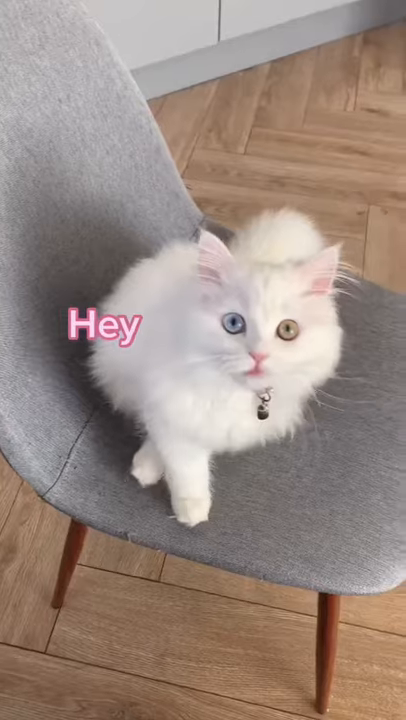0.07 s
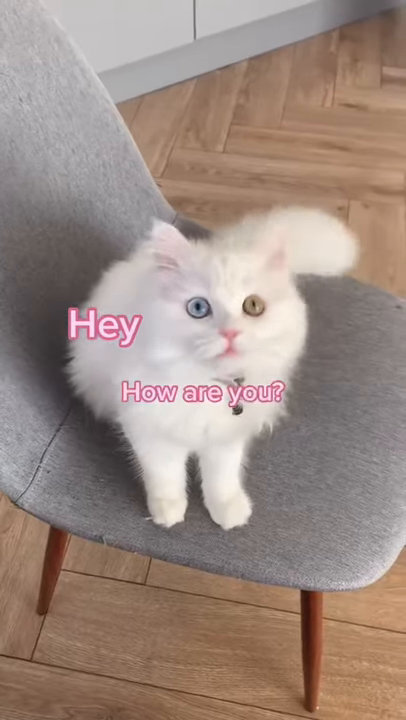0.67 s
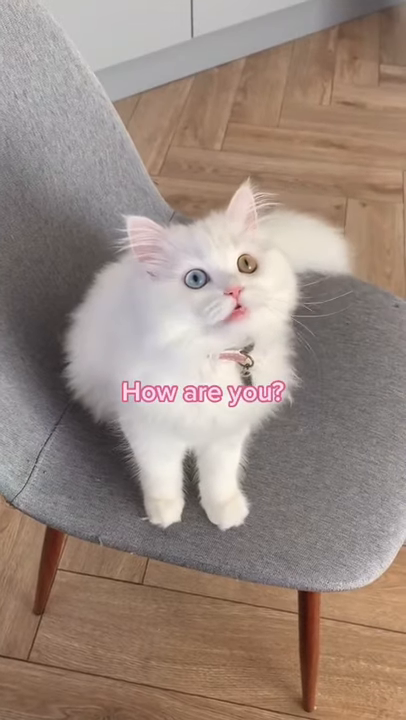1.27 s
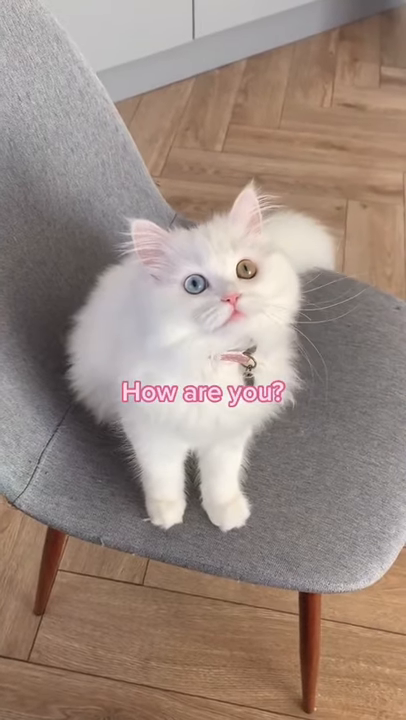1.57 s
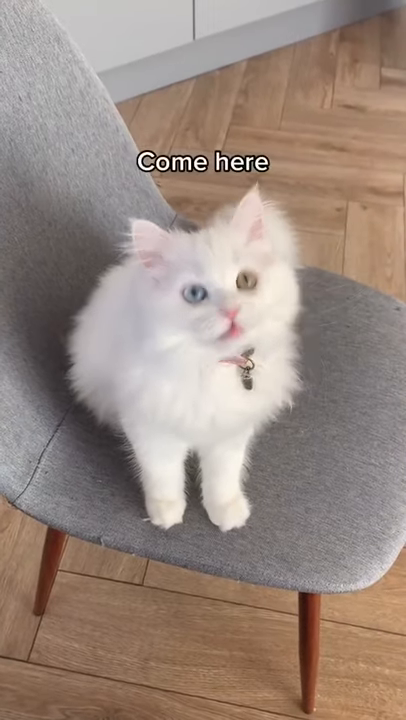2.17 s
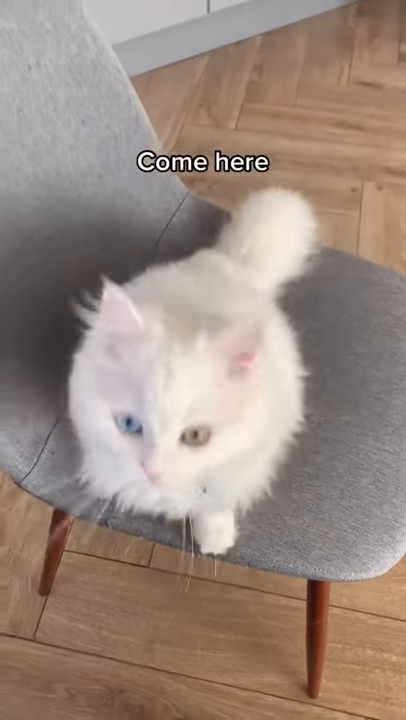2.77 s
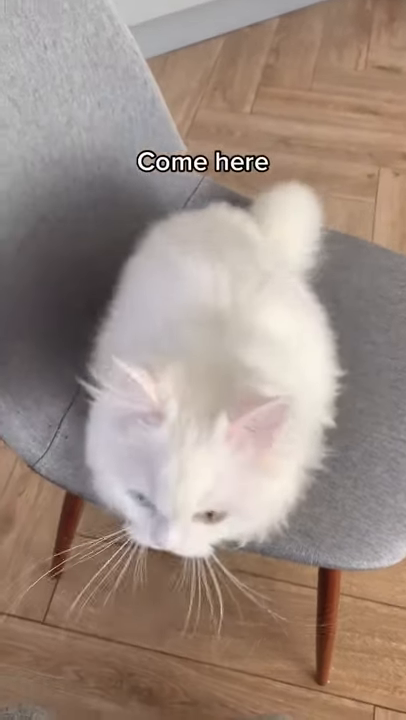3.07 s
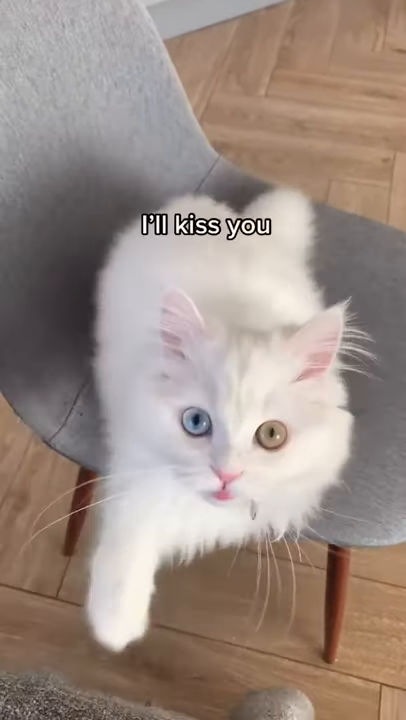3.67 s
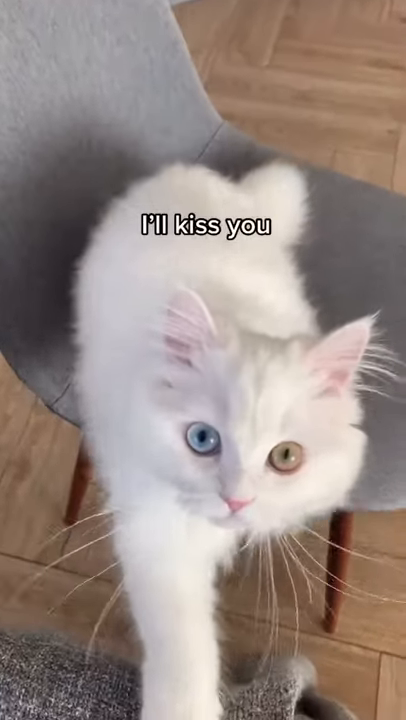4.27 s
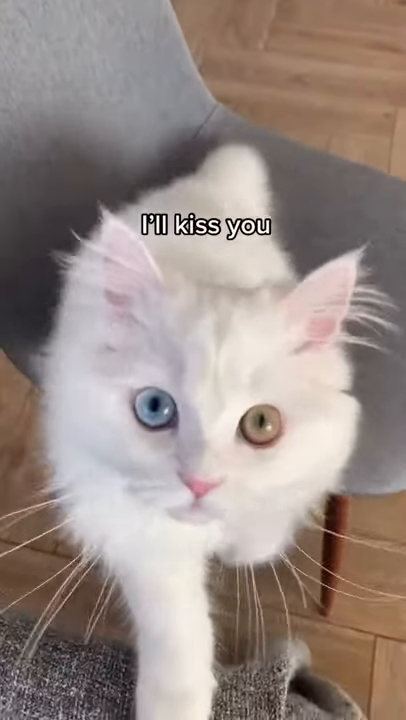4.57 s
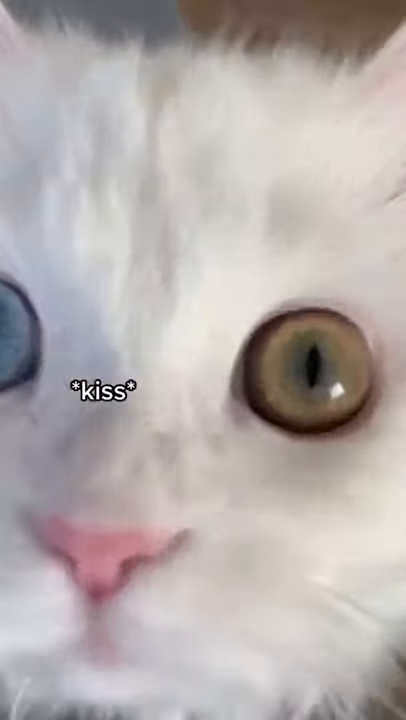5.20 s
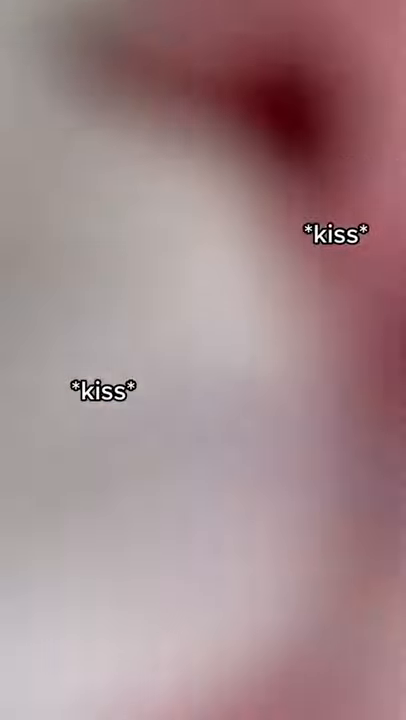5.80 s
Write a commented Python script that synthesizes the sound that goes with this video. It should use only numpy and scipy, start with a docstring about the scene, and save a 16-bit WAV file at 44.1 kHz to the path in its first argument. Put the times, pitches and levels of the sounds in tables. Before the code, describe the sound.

A young cat is close to a phone microphone in a quiet room, over steady low rumble and an appliance hum. It opens with a short sniff, then faint wet mouth clicks and tiny shivers of a metal collar tag. From 0.9 to 1.4 seconds it gives a soft, high meow that flips between two pitches, turning rough at each flip. A breathy squeak comes at 2.1 seconds and a very short grunt with a sharper mouth click at 2.5, both with sniffs. A faint lick at 3.3 leads to a chirp at 3.5 and a thin, quiet whine at 3.8. A fuller, warbling trill runs from 4.4 to 4.7, followed by a tiny falling peep at 5.2. At about 5.5 seconds fur brushes the microphone and the nose bumps it with a low, muffled thump, and the sound cuts off.

```python
"""A young cat on a chair, close to a phone in a quiet room, over low rumble and an appliance hum.
It sniffs, its wet mouth clicks and its collar tag shivers. From 0.9 s its vocal folds give a soft meow
that flips between two registers, rough at each flip. A squeak (2.1 s), a grunt (2.5 s), a lick (3.3 s)
and a chirp (3.5 s) follow among sniffs and clicks, then a whine (3.8 s), a trill (4.4 s) and a peep (5.2 s).
At 5.5 s its nose bumps the microphone and the sound stops."""
import sys
import numpy as np
from scipy import signal
from scipy.fft import rfft, irfft, next_fast_len
from scipy.io import wavfile
from scipy.ndimage import map_coordinates

SR = 44100
rng = np.random.default_rng(int(sys.argv[2]) if len(sys.argv) > 2 else 0)


def transcribe(u):
    """Save the signal u as a 16-bit wav file named by the first command-line argument.

    u: samples, shape (n,) or (channels, n), limited to [-1, 1]; the rate is SR.
    q: integer samples, one column per channel.
    """
    v = np.clip(np.atleast_2d(u).T, -1, 1)
    q = np.round(v * 32767).astype(np.int16)
    wavfile.write(sys.argv[1], SR, q)


N = 261954
TIME = np.arange(N) / SR


def cat_voice():
    """Seven calls, voiced through spread or rounded lips."""
    # note chains; registers near 850 Hz (mouth nearly shut) and 700 Hz (open): (time [s], first pitch [Hz],
    # last pitch [Hz], fundamental [dB], 2nd harmonic [dB], upper harmonics [dB], swell [dB], closing [dB])
    meow_notes = [(.9, 910, 900, -49, -62, -51.5, 8, 4.5), (.912, 762, 770.5, -59.5, -50, -47.5, 8.5, 14.5),
                  (1.006, 864, 860, -60, -67, -73.5, 3.5, 9), (1.118, 870, 877, -58, -65, -60.5, 0.5, -0.5),
                  (1.191, 673.7, 632.3, -53, -47, -62, -5.5, 22.5),
                  (1.362, 621, 569, -58, -52.5, -82, -1.5, 3), (1.409, 670, 683, -52, -59, -96, -8, 3)]
    whine_notes = [(3.768, 888, 843, -64.5, -62.5, -76.5, -10.5, -1),
                   (3.845, 790, 827, -66, -66, -83, -4, -9)]
    trill_notes = [(4.39, 828, 860, -57, -60, -94.5, 2, -10), (4.429, 671, 649, -53, -47.5, -75, 2, 4),
                   (4.463, 824.4, 869, -57.5, -58.5, -67.5, -5, 13),
                   (4.557, 692.6, 704, -45.5, -38, -56.5, 6.5, -9),
                   (4.602, 662, 669, -49, -35, -43, 0.5, 12), (4.640, 816, 885, -46.5, -47, -47.5, 5.5, 13)]
    # single glides:
    # (time [s], pitch [Hz], fundamental [dB], 2nd harmonic [dB], upper harmonics [dB], roughness [-])
    squeak = [(2.078, 1050, -55, -55, -72, 0.088), (2.087, 1182, -62, -49.5, -65, 0.28),
              (2.097, 1349, -66.5, -61, -73, 0.51), (2.107, 1261, -57.5, -51, -62, .08),
              (2.117, 1163, -54, -50, -61.5, 0.09), (2.135, 1350, -64.5, -74.5, -67, 0.36),
              (2.147, 1525, -54, -72, -76.5, .1), (2.168, 1760, -75.5, -82, -90, .1)]
    grunt = [(2.505, 788, -59, -52, -57.5, 0.5), (2.514, 762, -58, -60, -50.5, 0.8),
             (2.524, 857, -66, -52.5, -44.5, 0.71)]
    chirp = [(3.516, 1084, -60, -58.5, -81, 0.04), (3.531, 974, -50.5, -52, -48, 0),
             (3.541, 882, -45.5, -50, -58, 0.26), (3.545, 664, -63, -44.5, -55.5, 0.94),
             (3.558, 687, -70, -61, -53, 0), (3.572, 693, -78, -47, -71, 0.85),
             (3.582, 777, -50, -60, -67, 1.2)]
    peep = [(5.167, 1450, -71.5, -85, -97, 0.07), (5.18, 1392, -69, -74, -100, 0.05),
            (5.189, 1226, -70, -74, -94, 0.05), (5.201, 974, -65.5, -70, -105, 0.05)]
    # mouth response on the upper harmonics: (frequency [Hz], gain [dB])
    spread = [(1800, 14.5), (2300, -1), (2680, -4.5), (3100, -24.5), (3350, -3.5), (3520, -20), (3850, -23),
              (4600, -33.5), (5400, -27), (6150, -26), (7000, -28), (8500, -28), (9500, -50)]
    rounded = [(1800, 14), (2100, -1.5), (2550, 4.5), (2820, -3), (3150, -30), (3500, -26), (4000, -26.5),
               (4700, -28), (5500, -19.5), (6050, -11), (6700, -46), (7600, -25), (8700, -66)]
    meow = vocal_folds(phrase(meow_notes, end_s=1.428), spread, rasp_db=-22)
    whine = phrase(whine_notes, end_s=3.908, hoarse=.13)
    trill = phrase(trill_notes, end_s=4.66)
    soft_calls = sum(vocal_folds(rows, rounded, rasp_db=-30) for rows in (whine, trill, peep))
    airy_calls = vocal_folds(squeak, spread, rasp_db=-2)
    airy_calls += vocal_folds(grunt, spread, rasp_db=-19)
    airy_calls += vocal_folds(chirp, spread, rasp_db=-18.5)
    return meow + soft_calls + airy_calls


def vocal_folds(rows, mouth, rasp_db, jitter=.065, crack_db=-4, doubling=.79):
    """The folds make 12 harmonics and breath noise; roughness unsettles pitch and level."""
    # high partials radiated by the nose: (frequency [Hz], level re fundamental [dB])
    nasal = [(2000, -55), (4400, -55), (4950, -35), (5350, -29), (5700, -55), (6700, -52), (7000, -38),
             (7400, -55), (8600, -55), (9000, -32), (9600, -50)]
    # air through the open mouth: (frequency [Hz], relative density [dB])
    rasp = [(500, -31.5), (1200, 3), (2600, 6.5), (3200, -9), (4600, -20.5), (5400, -0.5), (6100, 5),
            (6900, 0), (8500, -10.5), (9700, -17.5)]
    # irregular fold vibration: (frequency [Hz], relative density [dB])
    crack = [(450, -8.5), (700, -4), (1350, 14.5), (2500, -4.5), (3000, -19), (4500, -35), (6000, -20.5),
             (9000, -32.5)]
    pitch_hz, first_db, second_db, upper_db, rough = curves(rows)
    rough = np.maximum(rough, .05)
    pitch_hz = pitch_hz * (1 + jitter * rough * wobble(700) + .003 * wobble(90))
    phase = 2 * np.pi * np.cumsum(pitch_hz) / SR + .042 * wobble(600)  # uneven cycles blur high harmonics
    tone = amp(first_db + flutter_db(first_db)) * np.sin(phase)
    tone += amp(second_db + flutter_db(second_db)) * np.sin(2 * phase)
    start_s, end_s = rows[0][0], rows[-1][0]
    on = (TIME > start_s - .01) & (TIME < end_s + .01)
    for k in range(3, 13):
        hz = k * pitch_hz[on]
        via_mouth = amp(upper_db[on] + along(mouth, hz))
        via_nose = amp(first_db[on] + along(nasal, hz))
        tone[on] += (via_mouth + via_nose) * np.sin(k * phase[on])
    # rough folds shimmer and alternate strong and weak cycles
    tone *= np.sqrt(2) * (1 + rough * (wobble(800) + doubling * np.sin(phase / 2)))
    air = amp(upper_db + rasp_db) * noise(rasp)
    air += rough * amp(np.maximum(upper_db, second_db) + crack_db) * noise(crack)
    air *= 1 + .5 * np.cos(phase)  # one puff a cycle
    return (tone + air) * gate(start_s, end_s, .006)


def phrase(notes, end_s, hoarse=.01, flip_s=.007, rough_s=.012, edge_s=.006, rough_per_octave=1.15):
    """Note chain to glide rows: the mouth swells and closes on each note; pitch jumps roughen the folds."""
    t = np.arange(notes[0][0], end_s, .001)
    columns = np.transpose(notes)[..., None]
    onset_s, from_hz, to_hz, first_db, second_db, upper_db, swell_db, closing_db = columns
    age_s, since_flip_s = t - onset_s[0], t - onset_s[1:]
    progress = np.clip((t - onset_s) / np.diff(onset_s, axis=0, append=end_s), 0, 1)
    mouth_db = swell_db * np.sin(np.pi * progress) - closing_db * progress
    crossfade = -np.diff(.5 + .5 * np.tanh(since_flip_s / flip_s), axis=0, prepend=1, append=0)
    blend = lambda per_note: np.sum(crossfade * per_note, axis=0)
    pitch_hz = blend(from_hz + (to_hz - from_hz) * progress ** 1.4)
    scoop = .15 * np.exp(-age_s / .009)  # starts sharp, settles
    waver = .0054 * np.interp(t, TIME, wobble(50))
    pitch_hz *= 1 + scoop + waver
    edge_db = np.exp(-age_s / edge_s) - 11.5 * np.exp((t - end_s) / edge_s)  # slight accent, release
    levels_db = [blend(db) + edge_db for db in (first_db, second_db + .43 * mouth_db, upper_db + mouth_db)]
    jump_octaves = np.abs(np.log2(from_hz[1:] / to_hz[:-1]))
    flip_rough = rough_per_octave * jump_octaves * np.exp(-(since_flip_s / rough_s) ** 2)
    release_rough = .35 * np.exp((t - end_s) / rough_s)
    rough = np.clip(hoarse + flip_rough.sum(axis=0) + release_rough, 0, 1)
    return np.transpose([t, pitch_hz, *levels_db, rough])


def flutter_db(level_db):
    """A partial flutters more the softer it is voiced."""
    return np.interp(level_db, [-66, -54, -42], [2.8, 1.2, .4]) * wobble(110)


def sniffs(nostril_db=6, log_width=.25):
    """Short rushes of air, coloured by a nostril resonance."""
    # puffs: (time [s], length [s], level [dB], swell [dB], nostril [Hz], treble edge [Hz], treble [dB])
    puffs = [(0.036, 0.02, -50, -4.5, 2480, 2700, -16.5), (2.067, 0.04, -58.5, 19.5, 2580, 5500, 1.5),
             (2.112, 0.034, -55.5, -6, 1900, 5500, 14), (2.519, 0.027, -56, -3.5, 3900, 5500, 11),
             (3.549, 0.031, -50, 4.5, 1480, 5500, 10.5)]
    # air through the nose: (frequency [Hz], relative density [dB])
    airflow = [(200, 11), (700, 5.5), (1500, 5), (2800, -0.5), (4000, 3.5), (5200, -9.5), (7000, -7.5),
               (8600, -15.5), (9700, -43.5)]
    out = np.zeros(N)
    for s, length_s, db, swell_db, nostril_hz, edge_hz, treble_db in puffs:
        peak_db = lambda hz: nostril_db * np.exp(-(np.log((hz + 1) / nostril_hz) / log_width) ** 2)
        shelf = [(edge_hz, 0), (7500, treble_db)]
        air = unit(filtered(noise(airflow), lambda hz: amp(peak_db(hz) + along(shelf, hz))))
        ramp = np.clip((TIME - s) / length_s, 0, 1) - .5
        out += amp(db + swell_db * ramp) * gate(s, s + length_s, .0083) * air
    return out * amp(2 * wobble(400))


def mouth_clicks(ring_t60_s=.0082, snap_t60_s=.014, snap_db=-5):
    """A wet film snaps and briefly rings the mouth cavity."""
    # clicks: (time [s], level [dB], resonance [Hz], treble [dB])
    clicks = [(.375, -49, 2660, 0), (0.728, -55, 5670, -25), (0.76, -58, 2520, 0.5),
              (1.156, -47, 1440, -25), (1.996, -54, 2530, -9), (2.114, -39, 2970, 0.5),
              (2.411, -57, 2930, -1), (2.4503, -40, 2720, -3), (2.523, -27.5, 2760, -12),
              (3.5721, -37, 2350, -5), (3.899, -53.5, 2150, -12)]
    # film snap: (frequency [Hz], relative density [dB])
    snap_spectrum = [(300, -16.5), (1200, 10.5), (3000, 1.5), (5000, 0.5), (7200, 0), (9500, -34)]
    out, t = np.zeros(N), np.arange(1024) / SR
    for s, db, hz, treble_db in clicks + lick():
        modes = np.sin(2 * np.pi * hz * t) + .31 * np.sin(2 * np.pi * 1.454 * hz * t)
        ring = modes * amp(-60 * t / ring_t60_s)
        snap = amp(treble_db + snap_db - 60 * t / snap_t60_s) * noise(snap_spectrum, size=len(t))
        add(out, s, amp(db) * (ring + snap))
    return out


def lick(start_s=3.344, gap_s=.016, scatter_s=.0011, level_db=-54, ring_hz=2740, treble_db=-18):
    """The tongue peels away: four rows of faint, similar clicks."""
    return [(start_s + k * gap_s + scatter_s * lag, level_db + accent, ring_hz * (1 + .06 * detune), treble_db)
            for k, (lag, accent, detune) in enumerate(rng.standard_normal((4, 3)))]


def nose_bump(rub_db=-53, rise_s=.0013):
    """Fur brushes the phone and the soft nose pushes it twice."""
    # pushes: (time [s], level [dB], frequency [Hz], t60 [s])
    pushes = [(5.546, -34.5, 110, 0.12), (5.5749, -21, 79.8, 0.07)]
    out, t = np.zeros(N), np.arange(SR // 8) / SR
    for s, db, hz, t60_s in pushes:
        envelope = amp(db - 60 * t / t60_s) * (1 - np.exp(-t / rise_s))
        add(out, s, envelope * np.sin(2 * np.pi * hz * t))
    fur = noise([(40, -7), (170, 4.5), (400, -4), (900, -21), (3000, -37.5), (8000, -54)])
    return out + amp(rub_db) * fur * gate(5.54, 5.595, .018)


def collar_tag(t60_s=.14):
    """A metal tag shivers in a narrow band, damped by fur."""
    # shivers: (time [s], level [dB])
    shivers = [(.37, -70.5), (0.718, -81.5), (.755, -74), (2.39, -78), (2.418, -71), (2.442, -75)]
    metal = [(5800, -31.5), (6900, 7), (7600, -15), (9500, -29.5)]
    out, t = np.zeros(N), np.arange(SR // 5) / SR
    for s, db in shivers:
        add(out, s, amp(db - 60 * t / t60_s) * noise(metal, size=len(t)))
    return out


def room(x, delay_s=.004):
    """The walls return a diffuse tail whose treble dies first."""
    # room decay: (frequency [Hz], t60 [s])
    decay = [(200, 0.84), (1300, 0.4), (2600, 0.28), (5000, .25), (9000, 0.18)]
    hz, t, bins = signal.stft(rng.standard_normal(SR // 2), SR, nperseg=256)
    tail = signal.istft(bins * amp(-60 * t / along(decay, hz)[:, None]), SR, nperseg=256)[1]
    tail = np.pad(tail / np.linalg.norm(tail), (int(delay_s * SR), 0))
    return signal.fftconvolve(x, tail)[:N]


def background(hiss_db=-83, hum_drift_rad=.84, crossover_hz=190, wander_db=1.42):
    """Room rumble and appliance hum waver and dip briefly, over faint steady hiss."""
    # rumble and hiss: (frequency [Hz], relative density [dB])
    rumble_spectrum = [(15, -42.5), (25, -5.5), (54, 2), (70, 3), (102, -3), (162, -4.5), (199, -10.5),
                       (290, -14), (327, -21), (375, -4.5), (422, -18), (493, -16.5), (555, -28),
                       (961, -31.5), (1500, -44.5), (1950, -79), (3300, -120)]
    hiss_spectrum = [(700, -34), (1300, -0.5), (2200, -1), (3500, -4.5), (5000, -6.5), (7000, -4),
                     (8600, -10.5), (9700, -15)]
    # slow rumble drift: (time [s], bass [dB], low mids [dB])
    drift = [(.1, -55, -52.5), (.4, -52, -54.5), (1.5, -54.5, -57.5), (1.9, -53.5, -55),
             (2.4, -56.5, -51.5), (2.72, -60, -50), (2.9, -54, -54), (3.8, -54, -50.5), (4.3, -54, -54),
             (5.45, -52.5, -53)]
    # appliance tones: (frequency [Hz], level [dB])
    tones = [(60, -67.5), (172, -64.5), (377, -73)]
    # dips in rumble and hum: (time [s], half width [s], depth [dB])
    dips = [(1.44, .04, 3.5), (2.61, 0.037, 7), (3.529, 0.051, 2), (4.579, 0.084, 12.5), (4.782, 0.082, 14)]
    hum = np.zeros(N)
    for hz, db in tones:
        gain = np.sqrt(2) * amp(db + 4.5 * wobble(7))
        hum += gain * np.sin(2 * np.pi * hz * TIME + hum_drift_rad * wobble(14))
    air = noise(rumble_spectrum)
    bass = filtered(air, lambda hz: 1 / (1 + (hz / crossover_hz) ** 6))
    bass_db, low_mid_db = curves(drift)
    rumble = amp(bass_db) * bass + amp(low_mid_db) * (air - bass)
    dip_db = sum(depth_db * np.exp(-((TIME - s) / width_s) ** 2) for s, width_s, depth_db in dips)
    return amp(wander_db * wobble(8) - dip_db) * (rumble + hum) + amp(hiss_db) * noise(hiss_spectrum)


def amp(db):
    """Decibels to gain."""
    return 10 ** (np.asarray(db) / 20)


def unit(x):
    """Scale to rms 1."""
    return x / np.sqrt(np.mean(x ** 2) + 1e-20)


def along(points, hz):
    """Interpolate (frequency [Hz], value) points on a log axis."""
    knots_hz, values = np.transpose(points)
    return np.interp(np.log(hz + 1), np.log(knots_hz + 1), values)


def curves(rows):
    """One value per sample for each column after the time."""
    times_s, *columns = np.transpose(rows)
    return [np.interp(TIME, times_s, column) for column in columns]


def wobble(rate_hz):
    """Smooth random curve, rate_hz knots a second."""
    return map_coordinates(rng.standard_normal(int(N * rate_hz / SR) + 4), [TIME * rate_hz])


def filtered(x, response):
    """Apply the gain response(hz)."""
    size = next_fast_len(len(x) + 8192)
    return irfft(rfft(x, size) * response(np.fft.rfftfreq(size, 1 / SR)), size)[:len(x)]


def noise(spectrum, size=N):
    """Noise of rms 1, shaped by (frequency [Hz], relative density [dB]) points."""
    return unit(filtered(rng.standard_normal(size), lambda hz: amp(along(spectrum, hz))))


def gate(start_s, stop_s, edge_s):
    """1 between two times, with soft edges."""
    inside_s = np.minimum(TIME - start_s, stop_s - TIME)
    return np.sin(np.pi / 2 * np.clip(inside_s / edge_s + .5, 0, 1)) ** 2


def add(track, start_s, sound):
    """Mix a short sound into a track."""
    part = track[round(start_s * SR):][:len(sound)]
    part += sound[:len(part)]


def scene():
    """The cat near the microphone, the room around it."""
    voice, nose, mouth = cat_voice(), sniffs(), mouth_clicks()
    echo = room(amp(-16) * voice) + room(amp(-4.5) * nose + amp(-10.5) * mouth)
    return (voice + nose + mouth + echo + collar_tag() + nose_bump() + background())[None]


def record(dry):
    """The phone passes 37-9600 Hz and cuts off just after the bump."""
    highpass = signal.butter(8, 37, "high", fs=SR, output="sos")
    gated = signal.sosfilt(highpass, dry[0]) * gate(start_s=.036, stop_s=5.632, edge_s=.002)
    return filtered(gated, lambda hz: 1 / np.sqrt(1 + (hz / 9600) ** 90))[None]


dry = scene()
out = record(dry)
transcribe(out)
```